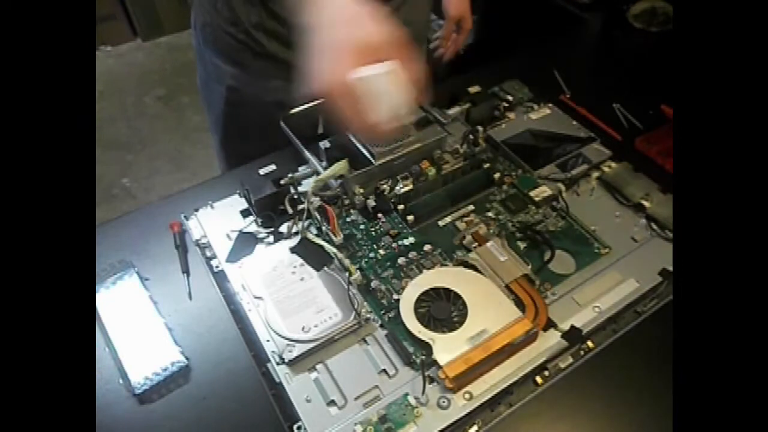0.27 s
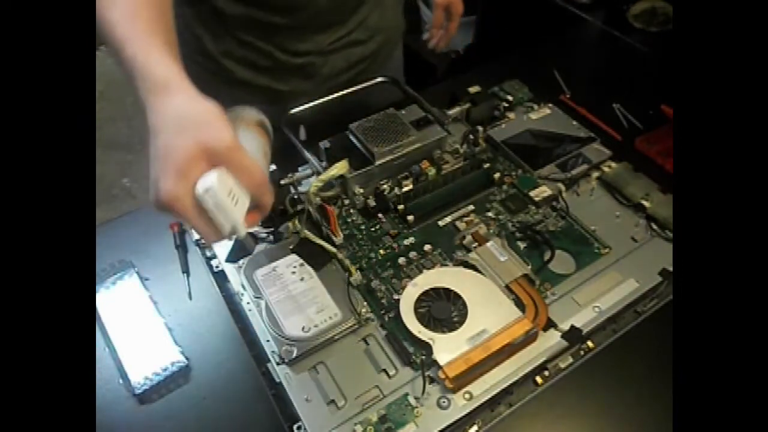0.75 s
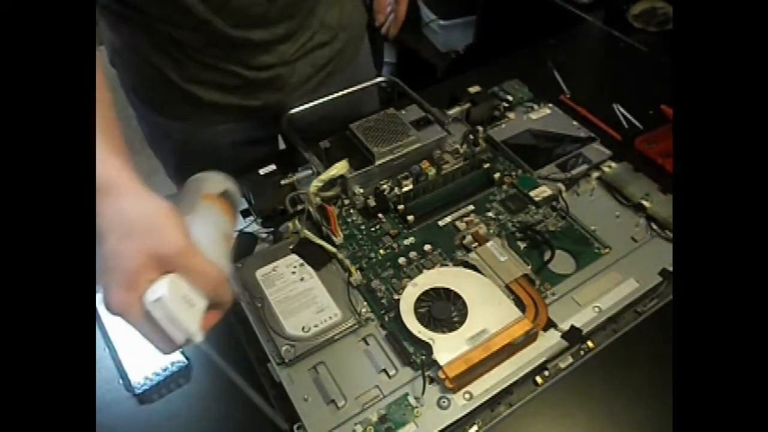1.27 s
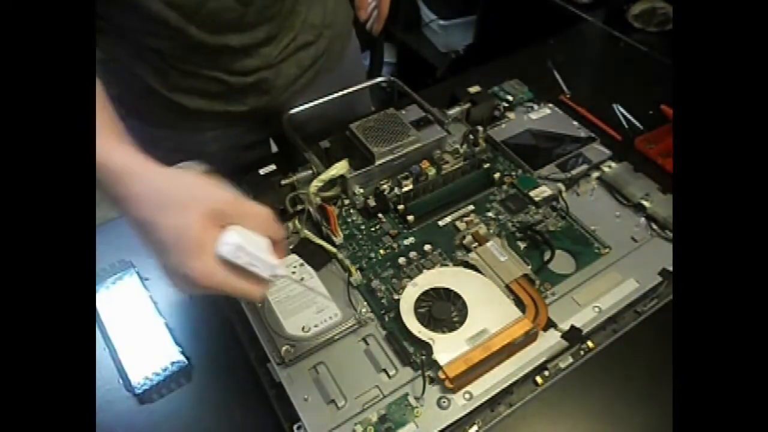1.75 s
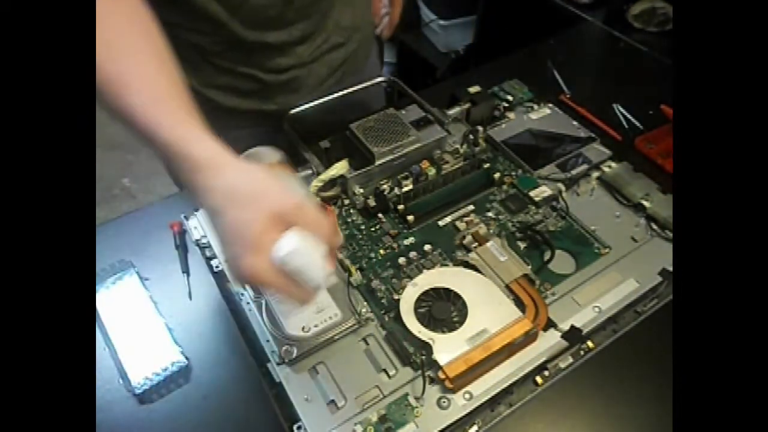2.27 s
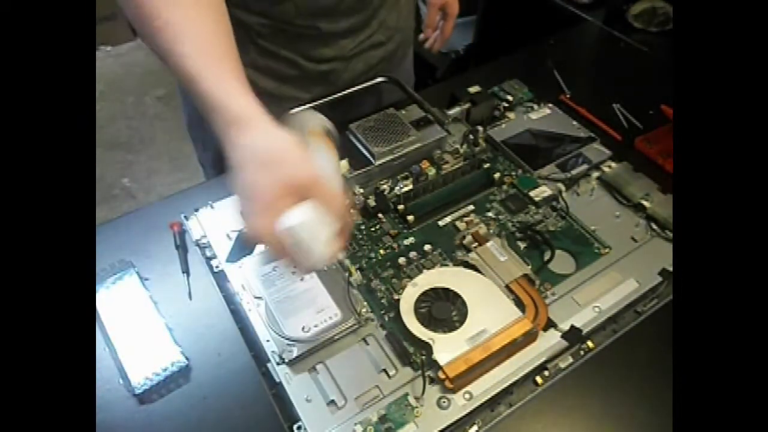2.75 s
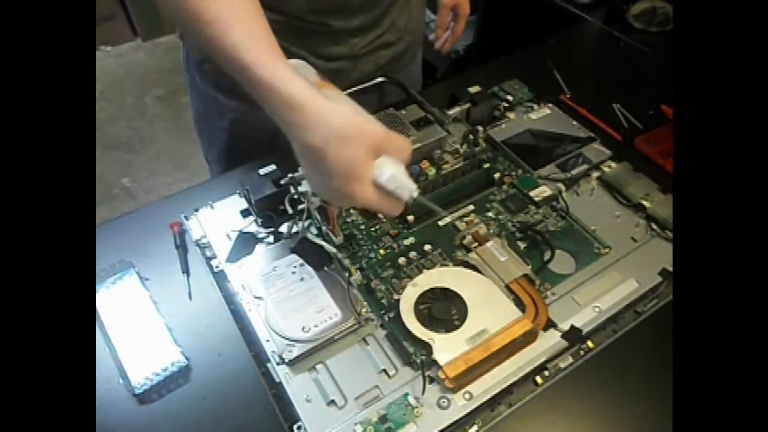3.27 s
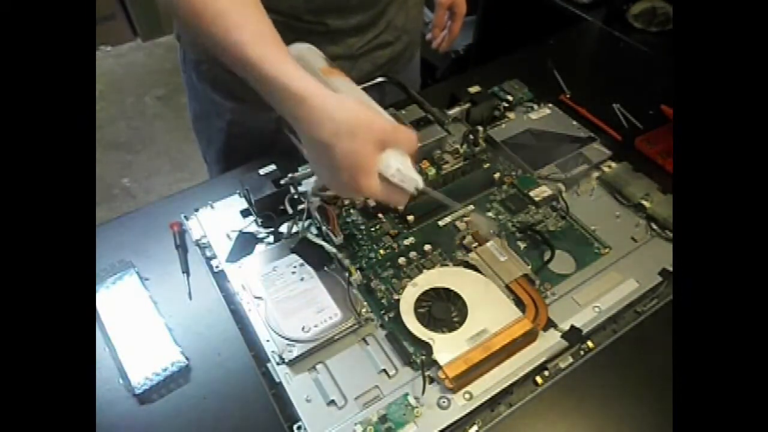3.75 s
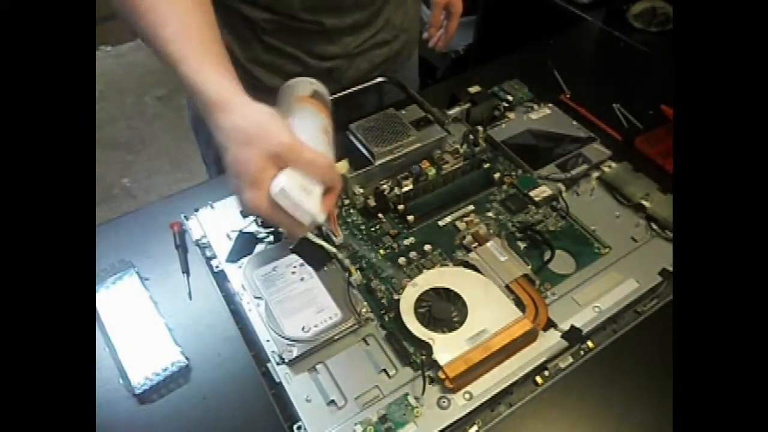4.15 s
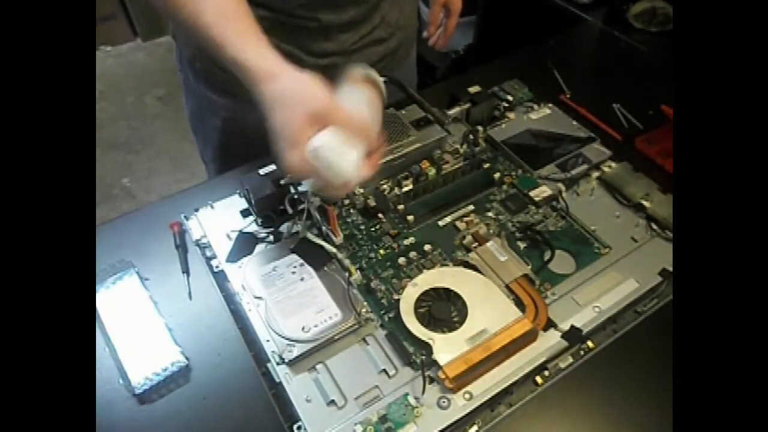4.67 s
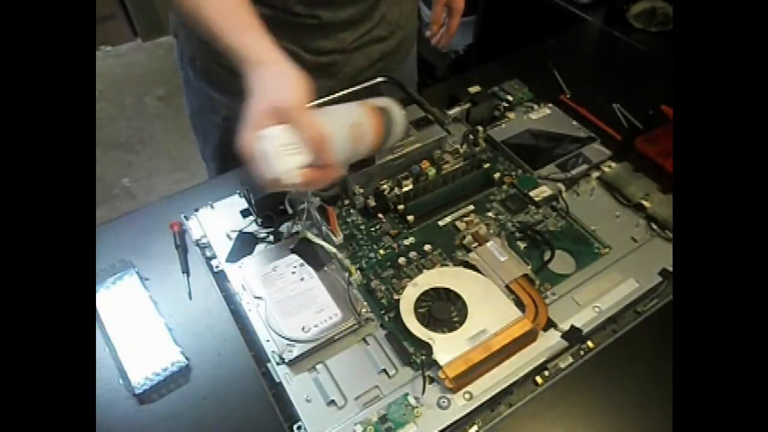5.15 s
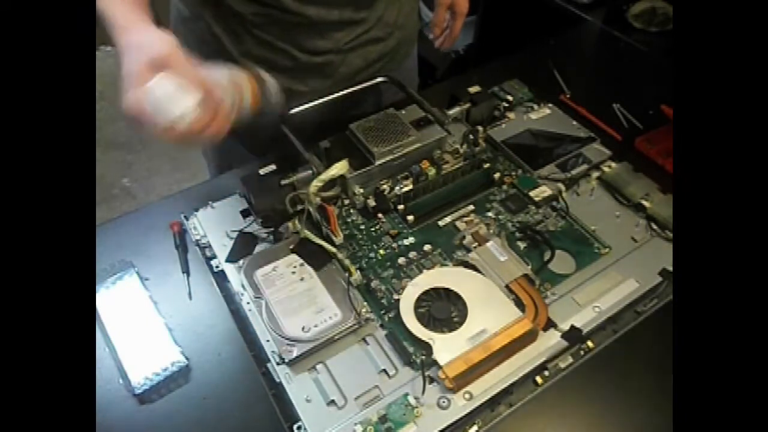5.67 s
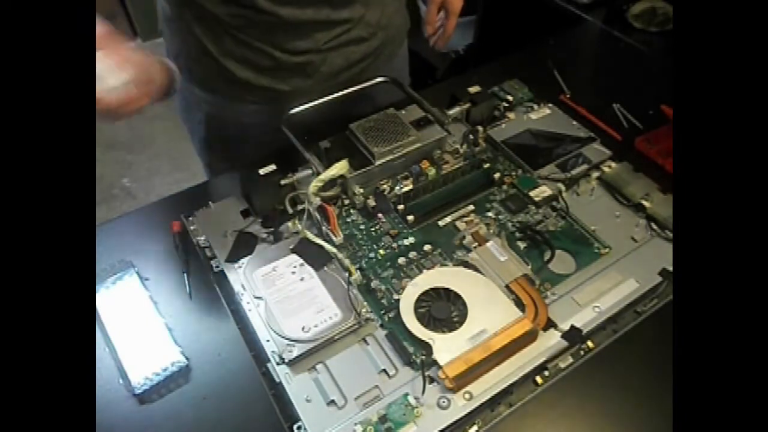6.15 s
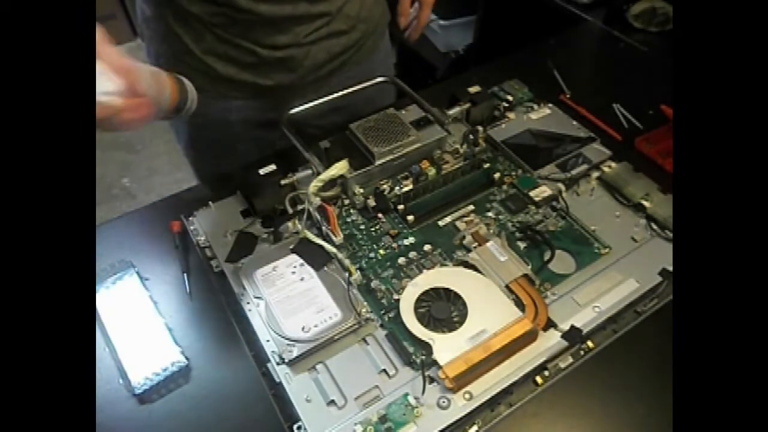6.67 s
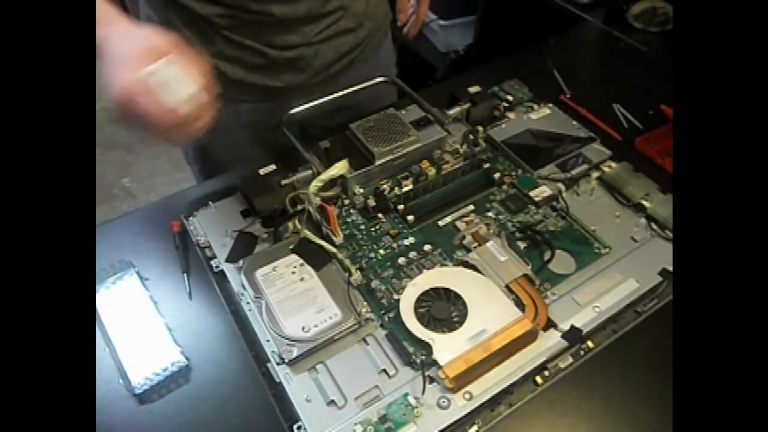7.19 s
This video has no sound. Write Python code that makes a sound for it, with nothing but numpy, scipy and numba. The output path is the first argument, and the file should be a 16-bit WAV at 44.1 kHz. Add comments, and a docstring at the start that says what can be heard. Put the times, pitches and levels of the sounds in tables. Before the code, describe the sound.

Close up in a small room, an air duster fires a quick run of bright, hissing puffs, the first two faint and the rest strong. About halfway through, the trigger is held down for a continuous hiss that wavers in strength. As the air sweeps over the circuit board and metal chassis of an open computer, it adds a hollow roar, low buffeting and fleeting half-whistles over faint room noise.

```python
"""Air duster on an open computer

Compressed air from a can, at a table in a small room: short puffs, then one long blast.
The straw hisses; where the jet meets the parts it rushes over edges, sounds the hollows of the
chassis and buffets flat metal. A close microphone with a treble notch overloads on the strongest puffs."""
import sys
import numpy as np
from scipy import signal
from scipy.fft import rfft, irfft
from scipy.io import wavfile
from scipy.ndimage import uniform_filter1d
from numba import njit

SR = 44100
rng = np.random.default_rng(int(sys.argv[2]) if len(sys.argv) > 2 else 0)


def unload_audio(sound):
    """Save the sound as a 16-bit wav file, at the path given as the first command line argument."""
    columns = np.transpose(np.atleast_2d(sound))
    # keep every value between -1 and 1, then stretch to whole-number steps
    steps = np.round(np.clip(columns, -1, 1) * 32767)
    wavfile.write(sys.argv[1], SR, steps.astype(np.int16))


N = 327222
TIME_S = np.arange(N) / SR
FREQ_HZ = np.maximum(np.fft.rfftfreq(N, 1 / SR), 1)
BLAST_S, BLAST_OPEN_S = 3.563, 0.073

# short trigger presses: start_s, open_s, held_s, hiss_db, sag_db, edge_db, hollow_db, buffet_db, valve_db
PUFFS = [ (-.03, .03, 0.058, -25.5, 7.5, -35, -35, -43.5, -60),
         (.145, 0.066, 0.086, -32, 2.5, -42, -38.5, -48, -67),
         (.447, 0.028, 0.097, -12.5, 4.5, -29.5, -28, -48, -34.5),
         (.72, .044, 0.11, -18, 3, -29, -20.5, -40, -44),
         (1.04, 0.045, 0.1, -15, 6.5, -19, -18.5, -36.5, -36),
         (1.31, 0.041, 0.086, -14.5, 2.5, -16.5, -17, -45, -38),
         (1.602, 0.028, 0.13, -14, 8, -34, -25, -63, -30),
         (1.911, 0.045, 0.13, -15, -0.5, -23.5, -33, -58, -33),
         (2.274, 0.042, 0.13, -11.5, 10, -28, -21, -41, -45),
         (2.45, 0.026, 0.025, -30.5, -2.5, -32.5, -28, -51, -56),
         (2.625, 0.063, 0.096, -12, 5, -17, -44, -53, -45),
         (2.98, 0.051, 0.25, -16, 5, -27.5, -25, -56, -42)]
# spray head modes: centre_hz, width_hz, level_db
HEAD_MODES = [(2274, 300, 3), (2660, 540, 0), (3460, 380, 0)]
# chassis modes: centre_hz, width_hz, level_db
CHASSIS_MODES = [(214, 25, 0.5), (285, 9.5, -3.5), (306.4, 8.4, 2.5), (401, 14, 3.5), (674.6, 13, -6),
                 (953, 53, -8), (1046, 14, -6), (1103, 37, -4.5), (1211, 9, -0.5), (1587, 10, -2.5),
                 (1723, 31, -3), (1918, 57, -6), (2200, 210, -11.5)]


def undb(db):
    """Decibels to gain."""
    return 10 ** (np.asarray(db) / 20)


def colour(points):
    """Gain spectrum through (freq_hz, level_db) points."""
    hz, db = np.transpose(points)
    return undb(np.interp(np.log(FREQ_HZ), np.log(hz), db))


def resonances(modes):
    """Gain spectrum of modes summed in power."""
    return np.sqrt(sum(undb(db) ** 2 / (1 + (2 * (FREQ_HZ - hz) / width_hz) ** 2)
                       for hz, width_hz, db in modes))


def unit(x):
    """Scale to rms 1."""
    return x / np.sqrt(np.mean(x ** 2))


def noise(spectrum):
    """Shaped noise, rms 1."""
    return unit(irfft(rfft(rng.standard_normal(N)) * spectrum, N))


def walk(rate_hz):
    """Smooth random drift, rms 1."""
    step = max(int(SR / rate_hz), 1)
    values = rng.standard_normal(N)[np.arange(N) // step]
    return unit(uniform_filter1d(values, step))


def swells(events):
    """Envelope that rises and decays at each event."""
    out = 0
    for start_s, level_db, rise_s in events:
        age = np.clip((TIME_S - start_s) / rise_s, 0, 50)
        out = out + undb(level_db) * age * np.exp(1 - age)
    return out


@njit
def bandpass(x, centre_hz, damping):
    """State-variable resonance with a moving centre."""
    y = np.empty(len(x))
    band_state, low_state = 0., 0.
    for i in range(len(x)):
        g = np.tan(np.pi * centre_hz[i] / SR)
        band = (band_state + g * (x[i] - low_state)) / (1 + g * (g + damping))
        band_state = 2 * band - band_state
        low_state += 2 * g * band
        y[i] = damping * band
    return y


def press(start_s, open_s, held_s, sag_db, climb_db=35, close_s=0.013):
    """Flow of one press: the valve eases open, pressure sags while held, flow dies on release."""
    age_s = TIME_S - start_s
    opening = undb(-climb_db * np.clip(1 - age_s / open_s, 0, 10) ** 1.31)
    sag = undb(-sag_db * np.clip((age_s - open_s) / held_s, 0, 1))
    closing = np.exp(-np.maximum(age_s - open_s - held_s, 0) / close_s)
    return opening * sag * closing


def background(room_db=-49, rumble_db=-57, draught_db=-48.5):
    """Room noise and a low rumble that grows in the draught of the long blast."""
    # room noise spectrum: freq_hz, level_db
    room_spectrum = [(20, 5.5), (30, 0), (80, -8.5), (140, -7), (200, -11.5), (320, -11.5), (1000, -19),
                     (3400, -23), (6700, -24), (9500, -22.5), (15000, -63.5)]
    rumble = noise(resonances([(100, 110, 0)]) ** 2)
    rumble *= np.hypot(undb(rumble_db), undb(draught_db) * blast())
    return rumble + undb(room_db) * noise(colour(room_spectrum))


def trigger(board_re_hiss_db=(-12, -14, -20)):
    """All presses drive four gains: hiss, edges, hollows, buffeting."""
    # jet strength in the long blast: time_s, hiss_db
    blast_hiss = [(3.62, -18.5), (3.69, -14.5), (3.71, -19.5), (3.78, -20), (4.0, -30), (4.17, -28.5),
                  (4.2, -19), (4.35, -20.5), (4.4, -28.5), (4.64, -28.5), (4.85, -18), (5.03, -27.5),
                  (5.13, -25.5), (5.17, -29), (5.22, -21.5), (5.77, -24.5), (5.88, -42), (6.1, -23),
                  (6.16, -26), (6.25, -17.5), (6.59, -29), (6.64, -23.5), (6.93, -22.5), (6.96, -18.5),
                  (7.25, -28), (7.42, -22.5)]
    blast_flow = blast() * undb(np.interp(TIME_S, *np.transpose(blast_hiss)))
    gains = np.outer(undb([0, *board_re_hiss_db]), blast_flow)
    for start_s, open_s, held_s, hiss_db, sag_db, edge_db, hollow_db, buffet_db, _ in PUFFS:
        flow = press(start_s, open_s, held_s, sag_db)
        gains += np.outer(undb([hiss_db, edge_db, hollow_db, buffet_db]), flow)
    return gains


def valve(crack_s=0.0076, whistle_s=0.008, blast_db=-49):
    """The first gas squeezes through the valve, rings the spray head and may whistle in the straw."""
    # thin whistles: start_s, level_db
    whistles = [(.168, -34.5), (.436, -39.5), (.721, -42.5), (1.012, -42)]
    # straw modes: centre_hz, width_hz, level_db
    straw_modes = [(7500, 220, 6.5), (8460, 180, 5.5)]
    cracks = [(start_s, valve_db, crack_s) for start_s, *_, valve_db in PUFFS]
    cracks.append((BLAST_S, blast_db, crack_s))
    head = swells(cracks) * noise(resonances(HEAD_MODES) ** 2)
    trickle = swells([(start_s, level_db, whistle_s) for start_s, level_db in whistles])
    return head + trickle * noise(resonances(straw_modes) ** 2)


def straw(flow, full_flow_db=-14, shrill_db=3.5, sputter_db=1.5, waver_db=1.16, head_db=-20):
    """The free jet hisses and rings the spray head; full flow is shrill and sputters; propellant spits."""
    # jet spectrum: freq_hz, level_db
    hiss_spectrum = [(300, -44), (900, -7), (3500, -17), (4600, -5), (5600, -1.5), (6300, 1), (7100, 2.5),
                     (8600, 1.5), (9600, -6), (10400, -10.5), (11400, -20.5), (13000, -41), (15500, -51.5)]
    # full-flow bands: centre_hz, width_hz, level_db
    shrill_bands = [(6255, 2030, 1), (6970, 1200, -6.5), (9530, 1450, -1)]
    # propellant spits: start_s, level_db, rise_s
    spits = [(.472, -9, .005), (.488, -12, 0.0045), (.534, -12.5, 0.0054), (1.428, -9, 0.0072),
             (1.624, -12, 0.02), (1.714, -8, 0.0037), (2.022, -9.5, 0.012), (2.083, -10.5, 0.0012),
             (2.313, -10.5, 0.012), (2.406, -6.5, 0.0045), (2.425, -10, 0.0021), (2.678, -8.5, 0.0044),
             (3.085, -11.5, 0.012), (3.151, -8, 0.0048), (3.16, -16.5, 0.027)]
    force = np.minimum(flow / undb(full_flow_db), 1)
    shrill = force * undb(shrill_db)
    hiss = noise(colour(hiss_spectrum)) + shrill * noise(resonances(shrill_bands) ** 3)
    hiss /= np.hypot(1, shrill)
    strength = np.hypot(flow, swells(spits))
    sputter = undb(sputter_db * force * walk(700) + waver_db * walk(45))
    head = flow * undb(head_db) * noise(resonances(HEAD_MODES) ** 2)
    return strength * hiss * sputter + head


def edges(centre_hz, broad_db=-13, smooth_db=-7, flutter_db=1.64):
    """The jet splits on sharp parts and half whistles in the slots between them."""
    # edge rush spectrum: freq_hz, level_db
    rush_spectrum = [(900, -41), (1900, -0.5), (2700, -2.5), (3900, 5), (5200, 3.5), (8000, -1), (11000, 1),
                     (13000, 1), (15500, -31.5)]
    # slots between board parts: centre_hz, width_hz, level_db
    slot_modes = [(2135, 490, 2.5), (2842, 31, 8), (3070, 58, 4.5), (3467, 150, 0), (3870, 37, 0.5),
                  (4170, 71, 0.5), (4800, 110, -2)]
    rush = noise(colour(rush_spectrum) * (undb(smooth_db) + resonances(slot_modes)))
    focused = bandpass(rush, centre_hz, damping=0.76)
    return unit(focused + undb(broad_db) * rush) * undb(flutter_db * walk(90))


def hollows(centre_hz, spill_db, damping=0.14, overtone_db=-9, smooth_db=-5, flutter_db=1.0):
    """Turbulence rings the chassis; the hollow under the nozzle picks out a tone and its overtone."""
    # roar spectrum: freq_hz, level_db
    roar_spectrum = [(200, -54), (400, -11.5), (600, -0.5), (950, 1.5), (2100, 1), (2700, -3),
                     (4500, -25.5), (9000, -37)]
    pitch_hz = centre_hz * np.exp(0.067 * walk(25))
    spectrum = colour(roar_spectrum) * (undb(smooth_db) + resonances(CHASSIS_MODES))
    roar = noise(spectrum)
    overtone = undb(overtone_db) * bandpass(roar, 1.487 * pitch_hz, damping)
    tone = unit(bandpass(roar, pitch_hz, damping) + overtone)
    spill = undb(spill_db)  # air that misses the hollow
    blend = (tone + spill * noise(spectrum)) / np.hypot(1, spill)
    return blend * undb(flutter_db * walk(70))


def buffeting(gain, smooth_db=-3, hard_hit_db=-23, boom_hz=226, boom_db=-4, flutter_db=2.1):
    """Large eddies flap against flat metal and stir its low modes; harder hits boom more."""
    # eddy spectrum: freq_hz, level_db
    eddy_spectrum = [(40, -37.5), (100, -12), (160, -4), (220, -6), (310, 0), (375, -7), (480, 0.5),
                     (700, 4), (1100, -8), (2500, -52)]
    flapping = noise(colour(eddy_spectrum) * (undb(smooth_db) + resonances(CHASSIS_MODES)))
    force = np.minimum(gain / undb(hard_hit_db), 1)
    boom = force * undb(boom_db) * noise(resonances([(boom_hz, 130, 0)]) ** 2)
    return gain * (flapping + boom) * unit(undb(flutter_db * walk(80)))


def sweep(board_gains, board_pitch_hz=1038, board_spill_db=7, board_rush_hz=2500, steepness=3.24):
    """Each part the jet crosses adds to the board's noise; pitch, spill and rush are power-weighted."""
    # passes over parts: middle_s, length_s, edge_db, hollow_db, buffet_db, pitch_hz, spill_db, rush_hz
    passes = [ (.825, 0.082, -9, -25.5, -48, 2130, 0, 2600),
              (1.119, 0.032, -21, -11.5, -40.5, 1050, 1, 2500),
              (1.364, 0.051, -27, -8, -36, 1215, -22, 2100),
              (1.414, 0.046, -25, -11.5, -44, 1230, -18, 2110),
              (1.702, 0.12, -22, -21.5, -50.5, 1230, -1, 2900),
              (1.963, 0.05, -12, -14, -35.5, 1496, -13, 2600), (2.013, .04, -20, -19, -42, 1130, 0, 3000),
              (2.101, 0.03, -17.5, -24.5, -62, 1150, -5, 3200),
              (2.387, 0.043, -11.5, -12.5, -49, 1130, -1, 2200),
              (2.412, 0.027, -11, -28, -53, 1130, -10, 3940),
              (2.674, 0.048, -36, -26, -37, 1000, -10, 3200), (2.743, 0.12, -17, -46, -67.5, 1000, 6, 4250),
              (3.062, 0.085, -27, -16, -58, 1280, -6, 2600), (3.095, 0.035, -15, -24, -48, 1100, 12, 3500),
              (3.156, 0.045, -14.5, -26, -31, 720, -18, 3400),
              (3.195, 0.2, -30.5, -27.5, -28, 720, 0, 3200), (3.63, 0.036, -19, -9.5, -37, 1156, -4, 2800),
              (3.683, 0.037, -21.5, -20, -37, 1000, 5, 3600),
              (3.78, 0.14, -29.5, -23, -24.5, 744, -1, 3200),
              (3.968, 0.061, -43, -30.5, -52, 1106, -9, 3200),
              (4.243, 0.11, -41, -27.5, -24.5, 745, 8, 3200),
              (4.318, 0.079, -27.5, -26, -50, 900, 21, 3200), (4.453, 0.1, -53, -34.5, -53, 1130, -6, 3200),
              (4.829, 0.15, -31, -22.5, -24.5, 900, 0, 3200),
              (4.88, 0.045, -39, -17.5, -47, 896, -3.5, 3200), (5.232, 0.077, -25, -42, -63, 2200, 2, 2400),
              (5.573, 0.093, -28, -23, -35.5, 850, 0, 3000), (5.72, 0.2, -36, -26, -35.5, 850, -1.5, 3000),
              (6.214, 0.059, -28.5, -26, -31, 800, 4, 3000), (6.28, 0.17, -30, -31, -56, 2100, 8, 2500),
              (7.133, 0.089, -38, -31.5, -36.5, 850, -9, 3000),
              (7.348, .022, -37, -28, -34.5, 940, -4, 2200)]
    power = board_gains ** 2 + 1e-12  # rows: edges, hollows, buffeting
    tone_sum = np.outer([board_pitch_hz, board_spill_db], power[1])
    rush_sum = board_rush_hz * power[0]
    for middle_s, length_s, *levels_db, pitch_hz, spill_db, rush_hz in passes:
        near = np.abs(TIME_S - middle_s) < 2 * length_s
        aim = 0.5 ** (np.abs(2 * (TIME_S[near] - middle_s) / length_s) ** steepness)
        part_power = np.outer(undb(levels_db), aim) ** 2
        power[:, near] += part_power
        tone_sum[:, near] += np.outer([pitch_hz, spill_db], part_power[1])
        rush_sum[near] += rush_hz * part_power[0]
    return np.sqrt(power), tone_sum / power[1], rush_sum / power[0]


def hoots(damping=0.33):
    """The sweeping jet catches an opening for an instant and hoots."""
    # caught hollows: middle_s, pitch_hz, level_db, sigma_s
    catches = [(1.357, 1140, -11, .005), (1.39, 1220, -16, 0.0035), (3.597, 1040, -30, 0.0053),
               (5.68, 1070, -26, 0.0073), (5.747, 786, -22, .0055), (6.195, 665, -30, 0.019),
               (6.65, 980, -39, 0.0086), (6.87, 1010, -31.5, 0.013), (7.09, 920, -22, 0.0047),
               (7.124, 830, -25, .005), (7.341, 890, -25.5, .007), (7.341, 2200, -25.5, .004)]
    out = np.zeros(N)
    for middle_s, pitch_hz, level_db, sigma_s in catches:
        near = np.abs(TIME_S - middle_s) < 0.1
        eddies = rng.standard_normal(N)[near]
        centre_hz = np.full(len(eddies), float(pitch_hz))
        hoot = unit(bandpass(bandpass(eddies, centre_hz, damping), centre_hz, damping))
        envelope = np.exp(-0.5 * ((TIME_S[near] - middle_s) / sigma_s) ** 2)
        out[near] += undb(level_db) * envelope * hoot
    return out


def thumps(centre_hz=115, width_hz=90):
    """Brief dull swells in the bass."""
    # soft thumps: middle_s, level_db, sigma_s
    bumps = [(1.37, -37.5, .006), (1.948, -29, 0.017), (4.648, -31.5, 0.016)]
    envelope = sum(undb(level_db) * np.exp(-0.5 * ((TIME_S - middle_s) / sigma_s) ** 2)
                   for middle_s, level_db, sigma_s in bumps)
    return envelope * noise(resonances([(centre_hz, width_hz, 0)]) ** 2)


def blast():
    """The valve opens for the long blast and is held to the end."""
    return press(BLAST_S, BLAST_OPEN_S, held_s=TIME_S[-1], sag_db=0)


def room(x, gap_s=0.0034, split_hz=4000, low_t60_s=0.4, high_t60_s=0.27):
    """Dense reflections from table and walls; the treble dies first."""
    t = TIME_S[:SR]
    scatter = rng.standard_normal(SR)
    low = signal.sosfilt(signal.butter(2, split_hz, fs=SR, output="sos"), scatter)
    high = signal.sosfilt(signal.butter(2, split_hz, "high", fs=SR, output="sos"), scatter)
    tail = (low * undb(-60 * t / low_t60_s) - high * undb(-60 * t / high_t60_s)) * (t > gap_s)
    return signal.fftconvolve(x, tail / np.linalg.norm(tail))[:N]


def scene():
    """The jet and what it strikes, in the room, over a quiet background."""
    gains = trigger()
    (edge_gain, hollow_gain, buffet_gain), (pitch_hz, spill_db), rush_hz = sweep(gains[1:])
    air = undb(0.81) * straw(gains[0])
    air += undb(-2.1) * edge_gain * edges(rush_hz)
    air += undb(-1.04) * hollow_gain * hollows(pitch_hz, spill_db)
    air += undb(2.5) * buffeting(buffet_gain)
    air += thumps() + hoots() + undb(-2) * valve()
    return (air + undb(-14.5) * room(air) + background())[None]


def record(dry, notch_hz=8030, notch_width_hz=800, notch_depth=0.81, knee=8.2, top_hz=15650):
    """The microphone port notches the treble, the loudest peaks flatten, the top is cut."""
    port = 1 - notch_depth / (1 + 2j * (FREQ_HZ - notch_hz) / notch_width_hz)
    notched = irfft(rfft(dry) * port, N)
    clipped = notched / (1 + np.abs(notched) ** knee) ** (1 / knee)
    return signal.sosfilt(signal.ellip(10, 0.2, 70, top_hz, fs=SR, output="sos"), clipped)


dry = scene()
out = record(dry)
unload_audio(out)
```